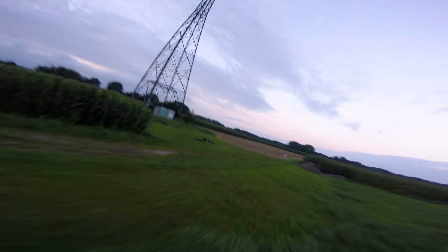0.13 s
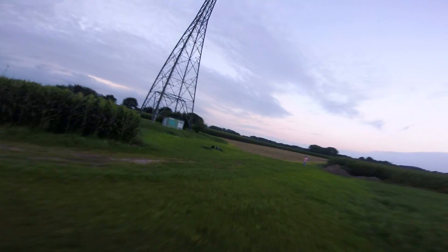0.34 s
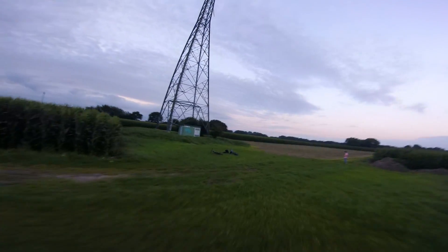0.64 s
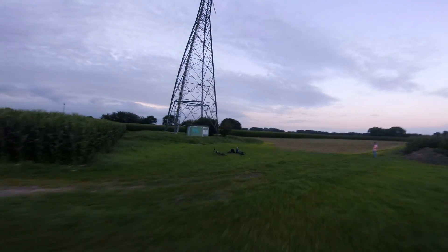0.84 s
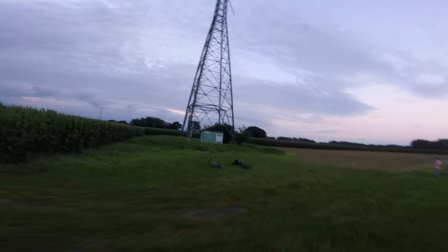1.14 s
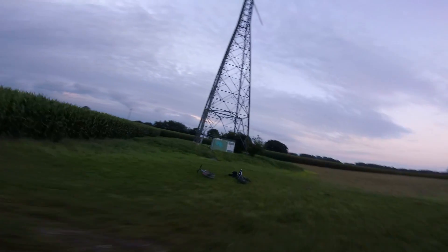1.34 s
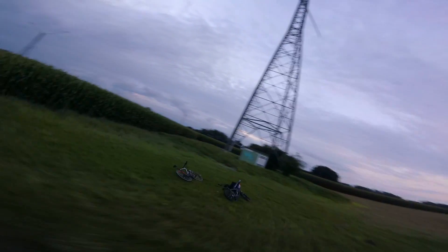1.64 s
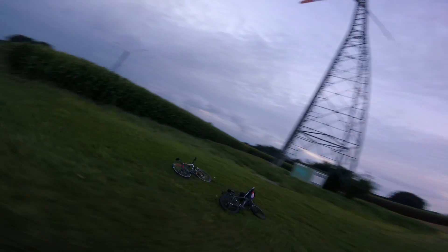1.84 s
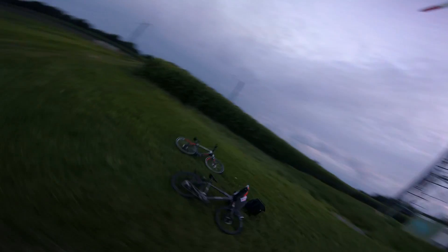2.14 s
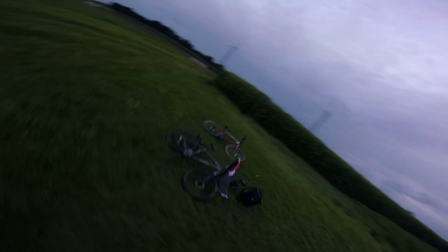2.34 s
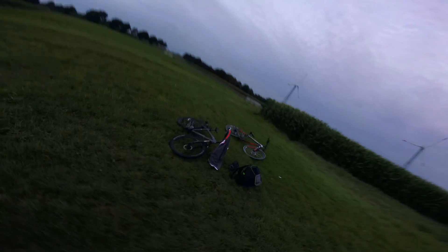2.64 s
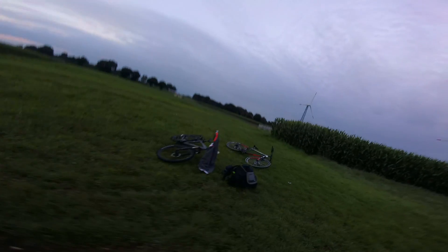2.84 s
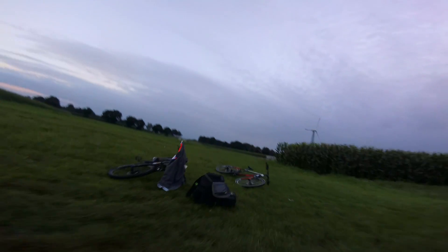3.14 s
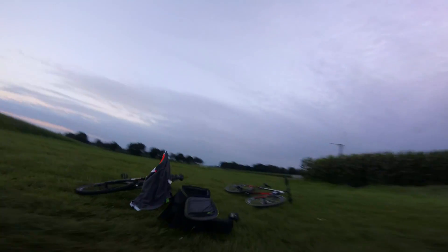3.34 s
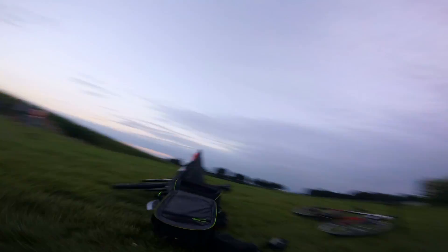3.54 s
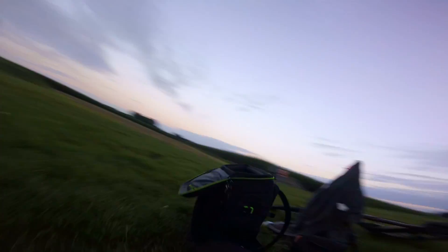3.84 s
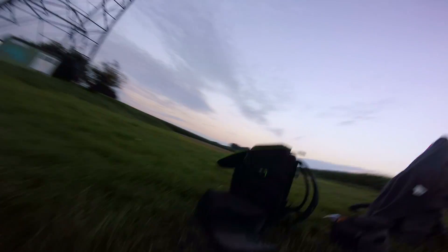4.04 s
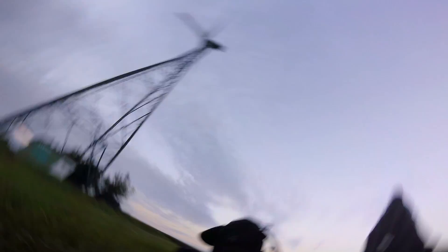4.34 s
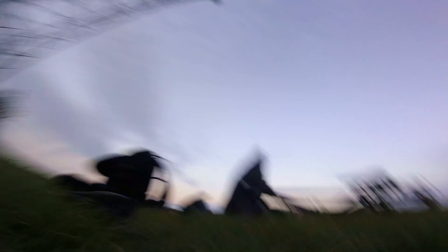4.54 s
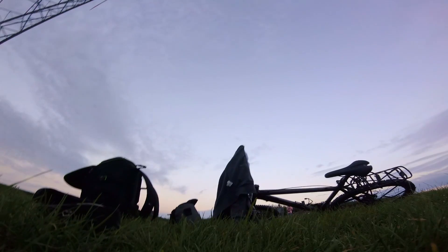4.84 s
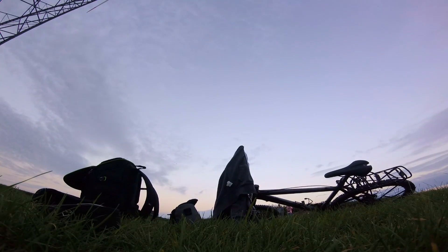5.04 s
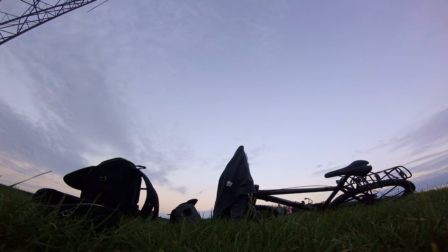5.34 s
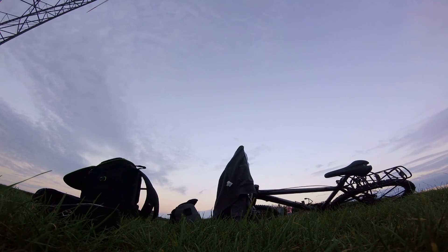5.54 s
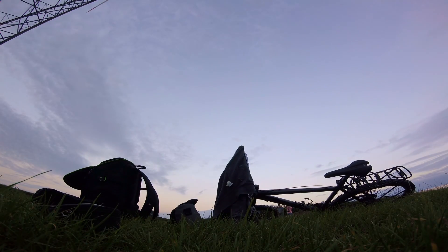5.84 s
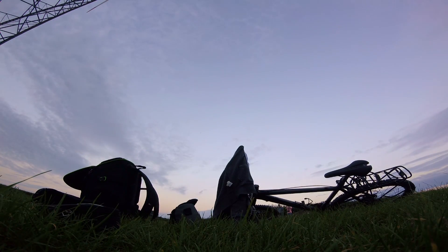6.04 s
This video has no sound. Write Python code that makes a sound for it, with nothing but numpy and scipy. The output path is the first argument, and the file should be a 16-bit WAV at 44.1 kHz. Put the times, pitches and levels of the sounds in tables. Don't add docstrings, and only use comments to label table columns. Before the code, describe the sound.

Heard from onboard, buzzing rotors sag and surge over a field before a hard tumbling grass crash, small rattles and a faint, slowly rising hush.

```python
import sys
import numpy as np
from scipy import signal
from scipy.fft import rfft, irfft
from scipy.io import wavfile
from scipy.ndimage import uniform_filter1d

SR = 44100
rng = np.random.default_rng(int(sys.argv[2]) if len(sys.argv) > 2 else 0)


def dump_mix(stems):
    frames = np.atleast_2d(stems).T
    limited = np.clip(frames, -1, 1)
    pcm = np.round(limited * 32767).astype(np.int16)
    wavfile.write(sys.argv[1], SR, pcm)


def attenuation_scalar(level_db):
    decades = np.asarray(level_db, float) / 20
    return 10 ** decades


N = 272538
MIDDLE_HZ = 190
FAST_HZ = 272


def rms_one(x):
    return x / np.sqrt(np.mean(x ** 2) + 1e-20)


def in_time(rows, fade_s=0.00583):
    s, *columns = np.transpose(rows)
    t = np.arange(N) / SR
    fade_in = np.clip((t - s[0]) / fade_s + 1, 0, 1)
    fade_out = np.clip((s[-1] - t) / fade_s + 1, 0, 1)
    return [fade_in * fade_out] + [np.interp(t, s, column) for column in columns]


def drift(rate):
    r = np.exp(-80 * np.pi * rate / SR)
    slow = signal.lfilter([1], [1, -2 * r, r * r], rng.standard_normal(N // 40 + 2002))[2000:]
    return np.interp(np.arange(N) / 40, np.arange(len(slow)), rms_one(slow))


def ring(clicks, hz, t60):
    r = attenuation_scalar(-60 / (t60 * SR))
    w = 2 * np.pi * hz / SR
    return signal.lfilter([0, np.sin(w)], [1, -2 * r * np.cos(w), r * r], clicks + 1e-18)


def coloured(x, spectrum):
    hz, level_db = np.transpose(spectrum)
    log_hz = np.log(np.arange(N // 2 + 1) * SR / N + 1)
    gain = attenuation_scalar(np.interp(log_hz, np.log(hz), level_db, -90, -90))
    return rms_one(irfft(rfft(x) * gain, N))


def turbulence(spectrum, gust_db, rate):
    gusts = attenuation_scalar(gust_db * drift(rate))
    return coloured(rng.standard_normal(N) * gusts, spectrum)


def clicks_at(s, level_db):
    train = np.zeros(N)
    train[np.round(s * SR).astype(int)] = attenuation_scalar(level_db)
    return train


def rotor(gate, hz, tones, hunt, flutter_db):
    # (centre [Hz], width [Hz])
    whine_peak = (7600., 2100.)
    peak_hz, width_hz = whine_peak
    on = gate > 0
    turn_hz = uniform_filter1d(hz, size=500) * (1 + hunt * drift(16.52))
    angle = 2 * np.pi * np.cumsum(turn_hz) / SR
    out = np.zeros(N)
    for multiple, level_db in tones:
        gain = np.sqrt(2) * attenuation_scalar((level_db + flutter_db * drift(22.3))[on])
        if multiple > 30:
            gain = 1.6 * gain / (1 + ((multiple * hz[on] - peak_hz) / width_hz) ** 4)
        wobble = .15 * min(multiple, 9) ** .5 * drift(30)[on]
        out[on] += gain * np.sin(round(multiple) * angle[on] + wobble + rng.uniform(0, 2 * np.pi))
    return gate * out, angle


def surges():
    # (time [s], half width [s], near gain [Hz], rear gain [Hz], side gain [Hz])
    corrections = [
        (1.84, 0.14, 3., 29.1, 49),
        (2.419, 0.087, 67, 70, 27),
        (2.69, 0.071, 47.6, 53.7, 29.5),
        (2.954, .085, 64, 50, -20.5),
        (3.652, 0.077, 81.6, 8.07, 4.),
    ]
    bite = [0, .45, .3, 1, 1]
    s, width_s = np.transpose(corrections)[:2, :, None]
    squareness = 2.8
    bells = np.exp(-np.abs((np.arange(N) / SR - s) / width_s) ** squareness)
    near_gain, rear_gain, side_gain = np.transpose(corrections)[2:] @ bells
    load_db = -24 * (1 - np.dot(bite, bells))
    return near_gain, rear_gain, side_gain, load_db


def loaded(hz, load_db):
    # (multiple of the turn rate, level at the top of a surge [dB])
    surge_tones = [(6, -41.), (9, -52.), (12, -48.), (15, -58.)]
    speed_db = 80 * np.log10(np.minimum(hz / FAST_HZ, 1))
    return [(multiple, db + load_db + speed_db) for multiple, db in surge_tones]


def near_rotor(gain_hz):
    # (time [s], turn rate [Hz], blade tone [dB], second blade tone [dB])
    near = [(0, 215, -22, -34.5), (.19, 227.7, -22, -37.5), (.3, 213.8, -23, -36), (.46, 208.5, -28, -35),
            (.55, 194, -24, -30.5), (.66, 192.4, -21, -34.5), (.9, 187.3, -23.5, -36),
            (1.08, 152.1, -18.5, -36.5), (1.45, 141.6, -19, -39.5), (1.7, 161.1, -13.5, -28.5),
            (2.1, 150.5, -16, -25), (2.28, 162.4, -14, -27.5), (2.57, 186.7, -20.5, -41),
            (2.83, 165.9, -20, -28), (3.13, 199.2, -15.5, -31), (3.25, 165.1, -17, -27.5),
            (3.4, 193, -27, -27.5), (3.54, 210.3, -25, -22.5), (3.78, 168, -12.5, -27.5),
            (3.88, 159.3, -19, -24), (4.12, 167.2, -19, -29.5), (4.165, 148.7, -37, -28.5)]
    # (time [s], level [dB])
    near_whine = [(0, -66), (.68, -64), (.76, -52), (.9, -52), (.95, -47), (1.0, -62), (1.14, -56),
                  (1.2, -68), (2.9, -66), (3.06, -54), (3.14, -60), (3.28, -60), (3.36, -49), (3.56, -45),
                  (3.62, -60), (3.7, -50), (3.76, -56), (3.82, -51), (3.92, -64)]
    # (multiple of the turn rate, level against the second blade tone [dB])
    near_upper = [(9, -15.), (12, -25.), (15, -32.)]
    # (multiple of the turn rate, level [dB])
    near_tones = [(1, -23), (2, -41)]
    gate, hz, blade_db, second_db = in_time(near)
    hz = uniform_filter1d(hz, size=1800) + gain_hz
    speed_db = 25 * np.log10(hz / MIDDLE_HZ)
    second_db = second_db - .5 * np.maximum(hz - 240, 0)
    tones = [(3, blade_db), (6, second_db)]
    tones += [(multiple, second_db + below_db + speed_db) for multiple, below_db in near_upper]
    tones += [(42, in_time(near_whine)[1]), *near_tones]
    return rotor(gate, hz, tones, hunt=.004, flutter_db=2.6)


def rear_rotor(gain_hz, load_db):
    # (time [s], turn rate [Hz], unbalance tone [dB], blade tone [dB])
    rear = [(0, 271, -21.5, -22.5), (.17, 275, -18, -19.5), (.28, 261, -17.5, -24), (.44, 262, -13.5, -27),
            (.58, 242, -14, -29.5), (.9, 237, -13, -27), (1.08, 211, -16, -26), (1.55, 207, -15.5, -20),
            (1.87, 212, -22.5, -34), (2.15, 218, -17.5, -58.5), (2.29, 220, -23, -26.5),
            (2.57, 252, -13, -24), (2.82, 232, -14.5, -24), (3.1, 232, -13, -27), (3.3, 188, -15.5, -26.5),
            (3.5, 177, -15.5, -22), (3.71, 236, -13.5, -35), (3.85, 160, -19.5, -29.5),
            (4.171, 178, -14, -23)]
    # (multiple of the turn rate, level [dB])
    rear_tones = [(2, -32), (6, -45), (7, -62)]
    gate, hz, unbalance_db, blade_db = in_time(rear)
    hz = uniform_filter1d(hz, size=1800) + gain_hz
    tones = [(1, unbalance_db), (3, blade_db), *rear_tones, *loaded(hz, load_db)]
    return rotor(gate, hz, tones, hunt=.003, flutter_db=2)[0]


def side_rotor(gain_hz):
    # (time [s], turn rate [Hz], unbalance tone [dB], blade tone [dB])
    side = [(0, 200.6, -29.5, -28), (.5, 196.9, -22.5, -27.5), (.75, 193.2, -17.5, -23),
            (.92, 189.8, -15, -23), (1.07, 170.1, -16.5, -31), (1.3, 167.2, -18, -17),
            (1.49, 159, -16, -20.5), (1.57, 146, -12.5, -27.5), (1.66, 148.4, -13.5, -45),
            (1.9, 151.8, -23, -20), (2.2, 149.4, -11.5, -28), (2.57, 167.5, -24, -22),
            (2.82, 171.1, -28, -22), (3.05, 143.1, -23.5, -47), (3.15, 146.2, -18, -30),
            (3.2, 154.4, -18.5, -25.5), (3.27, 144.3, -12, -30), (3.45, 148.6, -14.5, -38.5),
            (3.65, 153, -22, -34), (3.9, 155.4, -13, -22.5), (4.03, 163, -11.5, -13),
            (4.1, 169.1, -13.5, -19), (4.125, 168, -20, -11), (4.171, 100, -18, -25)]
    # (time [s], level [dB])
    side_whine = [(0, -68), (1.12, -66), (1.22, -52), (1.4, -54), (1.52, -49), (1.6, -66), (3.0, -66),
                  (3.1, -53), (3.17, -60), (3.22, -50), (3.42, -51), (3.5, -64), (4.08, -62), (4.13, -49),
                  (4.17, -52)]
    # (multiple of the turn rate, level [dB])
    side_tones = [(2, -36.5), (6, -42.5)]
    gate, hz, unbalance_db, blade_db = in_time(side)
    tones = [(1, unbalance_db), (3, blade_db), (42, in_time(side_whine)[1]), *side_tones]
    return rotor(gate, hz + gain_hz, tones, hunt=.003, flutter_db=2.2)[0]


def far_rotor(load_db):
    # (time [s], turn rate [Hz], unbalance tone [dB], blade tone [dB])
    far = [
        [(0, 135.7, -28, -29), (.06, 114.8, -27.5, -21), (.3, 125.2, -32, -40.5), (.9, 130.4, -26, -28),
         (1.4, 114.5, -45.5, -33), (1.8, 113.5, -46, -28.5)],
        [(.27, 174, -40.5, -28.5), (.45, 173.8, -31, -28.5), (.58, 170, -29, -43)],
        [(.52, 235.2, -30, -24), (.65, 211.9, -18, -29.5), (.83, 202, -22, -24.5)],
        [(.93, 175, -32.5, -38.5), (1.17, 172.9, -15, -24.5), (1.47, 181.3, -34, -25.5)],
        [(1.55, 180.2, -24, -32.5), (1.78, 178.9, -23.5, -39)],
        [(3.32, 212.2, -21, -43), (3.4, 230, -21, -46.5), (3.5, 239.2, -18, -31), (3.6, 288, -22.5, -21.5),
         (3.68, 289, -19, -24), (3.74, 228.2, -23, -31.5)],
        [(3.46, 134.5, -49, -31), (3.51, 120.3, -23.5, -27), (3.6, 135, -20.5, -27), (3.72, 198.5, -13, -30.5)],
        [(3.77, 178.4, -26, -23), (3.87, 170.2, -26, -22)],
        [(3.91, 167, -14, -16), (3.98, 155, -18, -16.5), (4.06, 172.4, -23.5, -20.5), (4.11, 175.6, -19, -18)],
        [(4.125, 180, -30, -30), (4.135, 180.6, -33.5, -13), (4.165, 96, -50, -46)],
    ]
    far_whine_db = [-72, -72, -72, -51, -72, -62, -72, -66, -55, -45]
    # (multiple of the turn rate, level [dB])
    far_tones = [(2.2, -35.5)]
    # (multiple of the turn rate, level against the blade tone [dB])
    far_upper = [(6, -12.), (9, -32.)]
    out = np.zeros(N)
    for stretch, whine_db in zip(far, far_whine_db):
        gate, hz, unbalance_db, blade_db = in_time(stretch, fade_s=0.046)
        hz = uniform_filter1d(hz, size=1800)
        if hz.max() > FAST_HZ:
            upper = loaded(hz, load_db)
        else:
            upper = [(multiple, blade_db + db) for multiple, db in far_upper]
        tones = [(1, unbalance_db), (3, blade_db), (42, whine_db), *far_tones, *upper]
        out += rotor(gate, hz, tones, hunt=.003, flutter_db=3)[0]
    return out


def rotors():
    near_gain, rear_gain, side_gain, load_db = surges()
    near, angle = near_rotor(near_gain)
    return near + rear_rotor(rear_gain, load_db) + side_rotor(side_gain) + far_rotor(load_db), angle


def air(angle):
    # (time [s], crosswind at the microphone port [dB], propeller wash [dB])
    wind = [(0, -28.5, -18), (.27, -32.5, -17.5), (.9, -30, -21.5), (1.1, -25, -17), (1.4, -28.5, -20),
            (1.57, -31, -26), (1.74, -21.5, -22.5), (1.85, -19.5, -20), (1.92, -30, -22.5),
            (1.99, -23.5, -21), (2.29, -23.5, -22), (2.39, -17, -19.5), (2.55, -28, -19),
            (3.03, -31.5, -25), (3.3, -56, -30.5), (3.56, -30.5, -21), (4.0, -46.5, -23.5),
            (4.19, -17.5, -26)]
    # (time [s], level [dB])
    airspeed = [(0, -41), (.3, -36), (.6, -28), (1.0, -28.5), (1.4, -35), (1.75, -35), (2.3, -44),
                (2.6, -33.5), (3.2, -53), (3.6, -34.5), (3.8, -64.5), (4.2, -65)]
    # (time [s], tip hiss at the middle speed [dB])
    inflow = [(0, -46.5), (.5, -38), (.92, -37), (1.32, -38.5), (1.58, -39.5), (1.73, -35), (1.81, -39.5),
              (1.98, -41), (2.39, -39), (2.55, -41.5), (2.72, -39), (2.83, -41.5), (3.0, -38.5),
              (3.18, -40), (3.5, -35.5), (3.8, -40.5), (4.15, -36), (4.19, -42)]
    # (frequency [Hz], level per Hz [dB])
    buffet_colour = [(20, -7), (60, -4), (125, 1.5), (200, 4.5), (400, -49)]
    # (frequency [Hz], level per Hz [dB])
    wash_colour = [(120, -2), (190, -4.5), (300, -24.5), (400, -0.5), (550, 3.5), (850, -3.5), (1080, -8),
                   (1280, -24), (1600, -26), (2200, -24)]
    # (frequency [Hz], level per Hz [dB])
    rush_colour = [(800, -8), (1100, 1.5), (1450, 5.5), (1750, -2.5), (2100, -24.5)]
    # (frequency [Hz], level per Hz [dB])
    swish_colour = [(1200, -6.5), (1900, 0.), (2800, 0.5), (3600, -9), (4500, -22)]
    # (frequency [Hz], level per Hz [dB])
    hiss_colour = [(2530, -29), (4300, -13), (6170, 0.5), (7140, 2), (8010, 1.5), (10400, -11.5),
                   (11200, -17), (13900, -27.5), (15000, -34.5)]
    gate, buffet_db, wash_db = in_time(wind, fade_s=.06)
    turn_hz = np.gradient(angle) * SR / (2 * np.pi)
    octaves = np.log2(np.maximum(turn_hz / MIDDLE_HZ, .5))
    inflow_db = in_time(inflow)[1]
    hiss_db = inflow_db + 7.5 * octaves
    swish_db = inflow_db + 3.5 * octaves - 5 + 1.06 * np.arange(N) / SR
    passes = 1 + 0.15 * np.sin(3 * angle)
    buffet = attenuation_scalar(buffet_db + 5) * turbulence(buffet_colour, gust_db=1.5, rate=8.5)
    wash = attenuation_scalar(wash_db) * turbulence(wash_colour, gust_db=.8, rate=12)
    rush = attenuation_scalar(in_time(airspeed)[1]) * turbulence(rush_colour, gust_db=1.95, rate=15)
    swish = attenuation_scalar(swish_db) * turbulence(swish_colour, gust_db=1, rate=30)
    hiss = attenuation_scalar(hiss_db) * turbulence(hiss_colour, gust_db=1.32, rate=21)
    return gate * (buffet + wash + rush + passes * (swish + gate * hiss))


def blows():
    # (time [s], low push [dB], frame ring [dB], knock [dB], crack [dB])
    hits = [(4.199, -14, -24, -36, -57), (4.207, -2, -22, -30, -51), (4.2161, -25, -5, -7, -45.5),
            (4.2223, -2, -23, -12, -35.5), (4.234, -13, -26, -3.5, -34), (4.249, -7, 0.5, -14, -39.5),
            (4.261, -9, 0, -12, -41), (4.456, -23, -44, -51, -61), (4.468, -23, -33, -44.5, -57),
            (4.516, -24, -18, -54, -67), (4.53, -5.5, -30, -38, -57.5), (4.544, -6.5, -7.5, -36, -59),
            (4.588, -18, -28, -60, -56), (4.679, -38, -31.5, -52, -66), (4.7, -14.5, -28, -51, -73),
            (4.753, -18.5, -33, -57, -100), (4.77, -30, -48, -63, -85)]
    # (frequency [Hz], level [dB], time to fall 60 dB [s])
    frame = [(125, 0.5, 0.31), (71.6, -7.5, 0.077), (209, -10.5, 0.11)]
    # (frequency [Hz], level [dB], time to fall 60 dB [s])
    shell = [(348.4, -7.5, 0.058), (452, -5, 0.038), (710, -18, 0.023), (1130, -16, 0.027)]
    s, push_db, frame_db, knock_db, crack_db = np.transpose(hits)
    out = ring(clicks_at(s, push_db + 6.5), 42, 0.043)
    for hz, level_db, t60 in frame:
        out -= ring(clicks_at(s, frame_db + level_db + 0.5), hz, t60)
    for hz, level_db, t60 in shell:
        chance_db = rng.normal(0, 1.3, len(s))
        out += ring(clicks_at(s, knock_db + level_db + chance_db), hz, t60)
    soft = signal.sosfilt(signal.butter(4, 1100, fs=SR, output="sos"), out)
    dying = signal.lfilter([1], [1, -attenuation_scalar(-60 / (0.016 * SR))], clicks_at(s, crack_db - 8) + 1e-18)
    snap = [(1200, -8), (2500, 0), (4200, -14), (7000, -10), (9500, -16), (12000, -40)]
    return soft + dying * coloured(rng.standard_normal(N), snap)


def arm_hum():
    t = np.arange(N) / SR
    start_s, damped_s = 4.217, 4.88
    level_db = -18.5 - 60 * (t - start_s) - 110 * np.maximum(t - damped_s, 0) + 4.5 * drift(12)
    onset = np.clip((t - start_s) / .006, 0, 1)
    return np.sqrt(2) * attenuation_scalar(level_db) * onset * np.sin(2 * np.pi * 185.5 * t)


def ticks():
    # (time [s], case body level [dB], port level [dB])
    snaps = [(4.2205, -24, -22), (4.2255, -45, -39), (4.234, -33, -43), (4.2465, -38, -50),
             (4.253, -46, -47), (4.2603, -50, -42), (4.271, -42, -52), (4.292, -46, -53), (4.322, -48, -58),
             (4.335, -46, -60), (4.345, -50, -70), (4.357, -52, -72), (4.368, -52, -74), (4.38, -53, -72),
             (4.403, -59, -66), (4.4705, -47, -59), (4.484, -54, -66), (4.502, -56, -62), (4.532, -44, -64),
             (4.537, -41, -62), (4.547, -43, -60), (4.56, -48, -66), (4.583, -50, -68), (4.589, -42, -57)]
    # (frequency [Hz], level [dB], time to fall 60 dB [s])
    tick_body = [(1900, -3, .009), (2800, -2, .009)]
    # (frequency [Hz], level [dB], time to fall 60 dB [s])
    tick_port = [(4300, -9, .003), (5400, -7, .003), (6500, -2, .005), (7900, 0, .003), (9300, -5, .003),
                 (11500, -14, .002)]
    s, body_db, port_db = np.transpose(snaps)
    out = np.zeros(N)
    for k, (hz, level_db, t60) in enumerate(tick_body + tick_port):
        part_db = body_db if k < len(tick_body) else port_db
        chance_db = 2.5 * rng.normal(0, 1, len(s))
        out += ring(clicks_at(s, part_db + level_db + chance_db), hz, t60) * (-1) ** k
    return signal.sosfilt(signal.butter(4, 12000, fs=SR, output="sos"), out)


def grass_drags():
    # (time [s], rub [dB], crackle [dB], hold [s])
    drags = [(4.23, -13, -34, .004), (4.273, -21, -49, 0.035), (4.333, -28, -60, 0.023),
             (4.39, -45, -70, 0.063), (4.47, -46, -64, .004), (4.505, -47, -62, .02),
             (4.541, -24, -52, .004), (4.543, -26, -48.5, 0.011), (4.624, -53, -85, .03),
             (4.681, -47, -67, 0.013), (4.78, -54, -78, .004), (4.86, -67, -91, 0.033)]
    # (frequency [Hz], level per Hz [dB])
    rub_colour = [(130, -24), (220, 0.5), (605, 1), (746, -2), (808, -1.5), (1020, -11.5), (1500, -40),
                  (1950, -75), (3300, -120)]
    t = np.arange(N) / SR
    s, rub_db, crackle_db, hold_s = np.transpose(drags)[:, :, None]
    rise_db = 904 * np.maximum(s - t, 0)
    after = np.maximum(t - s - hold_s, 0)
    rub_level_db = np.max(rub_db - rise_db - 293 * after, axis=0) - 4
    crackle_level_db = np.max(crackle_db - rise_db - 416 * after, axis=0) - 3.5
    rub = attenuation_scalar(rub_level_db) * turbulence(rub_colour, gust_db=1.5, rate=140)
    strength = attenuation_scalar(2.5 * np.minimum(rng.exponential(1, N), 4))
    stalks = (rng.random(N) < 1400 / SR) * strength * rng.choice([-1, 1], N)
    crackle_colour = [(1200, -15), (1700, 0), (2800, -6), (3700, -15), (4500, -37.5), (6200, -23),
                      (7500, -17.5), (9000, -27), (11000, -38)]
    return rub + attenuation_scalar(crackle_level_db) * coloured(stalks, crackle_colour)


def rattles():
    # (time [s], level [dB])
    taps_at = [
        (4.471, -51),
        (4.679, -45.5),
        (4.694, -55),
        (4.745, -59.5),
        (4.77, -58),
        (4.792, -60),
    ]
    # (frequency [Hz], level [dB], time to fall 60 dB [s])
    cover = [(627, -9, 0.058), (804, -2, 0.084), (1020, 1.5, 0.064)]
    s, tap_db = np.transpose(taps_at)
    taps = uniform_filter1d(clicks_at(s, tap_db), size=12)
    return sum(attenuation_scalar(level_db) * ring(taps, hz, t60) for hz, level_db, t60 in cover)


def field():
    # (frequency [Hz], level per Hz [dB])
    rumble_colour = [(15, -11), (40, 3), (70, 5), (110, -10.5), (160, -1), (200, -12.5), (300, -26)]
    # (frequency [Hz], level per Hz [dB])
    far_hiss_colour = [(150, -33), (250, -2), (448, -1), (620, -6.5), (967, -4.5), (1090, -8.5),
                       (2240, -14.5), (4440, -28), (8090, -15.5), (15000, -33.5)]
    since = np.maximum(np.arange(N) / SR - 4.96, 0)
    rumble = attenuation_scalar(-63 + 11 * since) * turbulence(rumble_colour, gust_db=2, rate=8)
    far_hiss = attenuation_scalar(-82 + 14.5 * since) * turbulence(far_hiss_colour, gust_db=-1, rate=10)
    return rumble + far_hiss


def scene():
    whine, angle = rotors()
    flight = whine + air(angle)
    fall = blows() + arm_hum() + ticks() + grass_drags() + rattles()
    return (flight + fall + field())[None]


def top_cut(x):
    return signal.sosfilt(signal.butter(12, 15140, fs=SR, output="sos"), x)


def record(dry):
    overload = 0.94
    rounded = dry / (1 + np.abs(dry / overload) ** 6) ** (1 / 6)
    return top_cut(rounded)


dry = scene()
out = record(dry)
dump_mix(out)
```